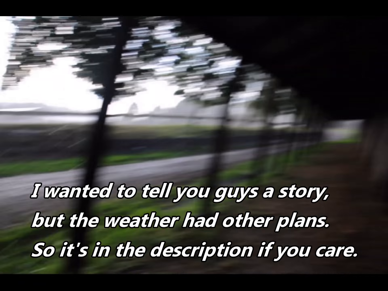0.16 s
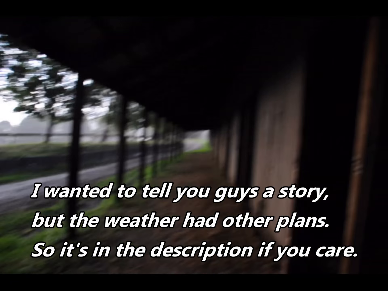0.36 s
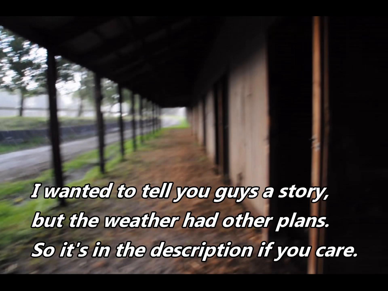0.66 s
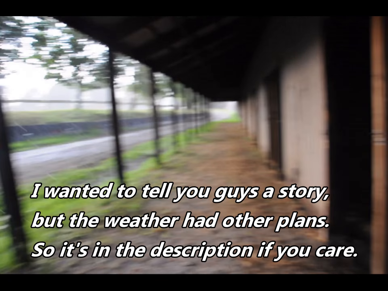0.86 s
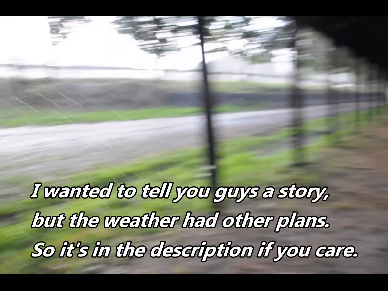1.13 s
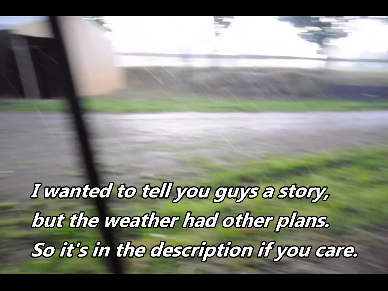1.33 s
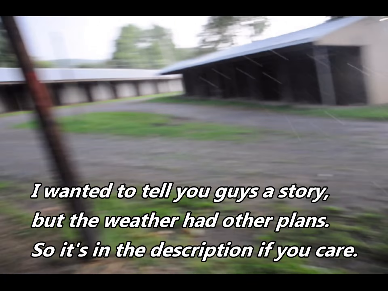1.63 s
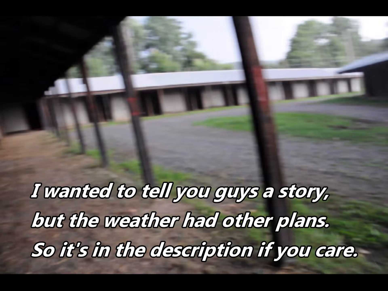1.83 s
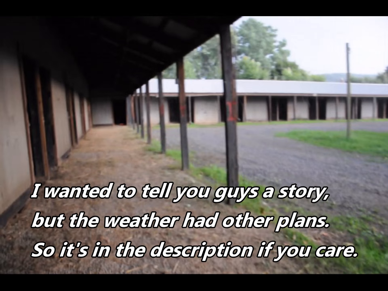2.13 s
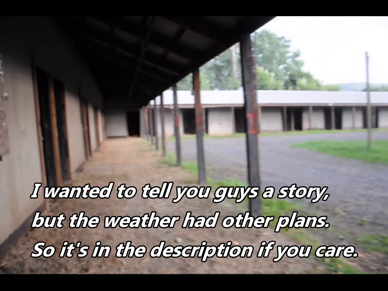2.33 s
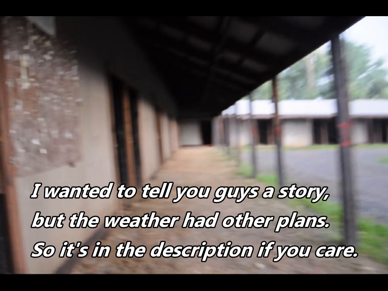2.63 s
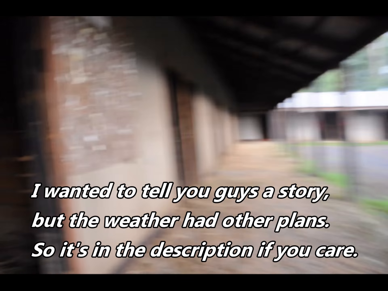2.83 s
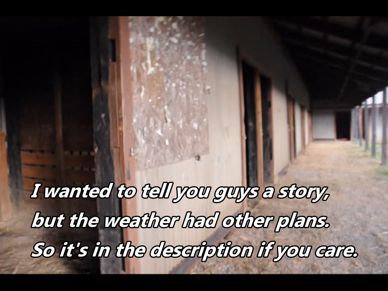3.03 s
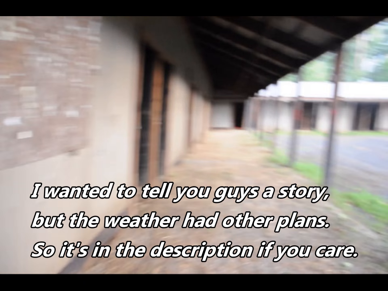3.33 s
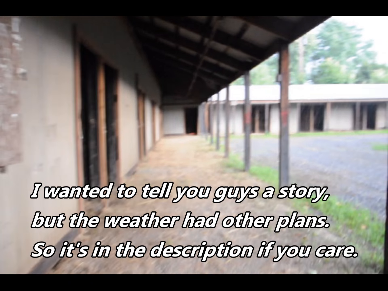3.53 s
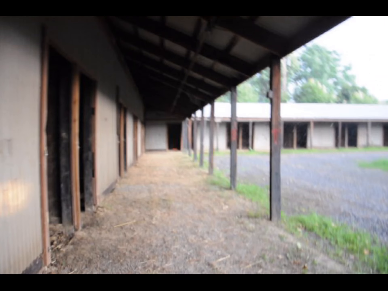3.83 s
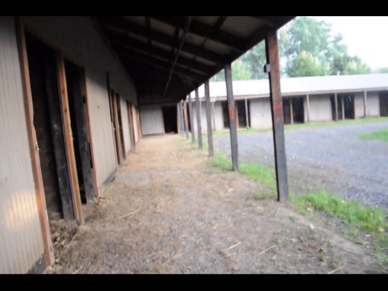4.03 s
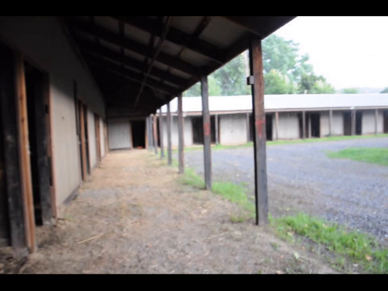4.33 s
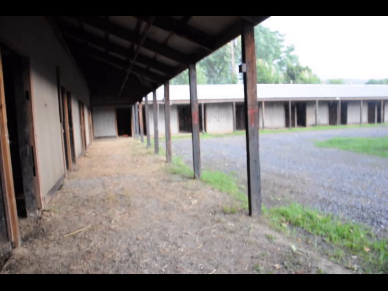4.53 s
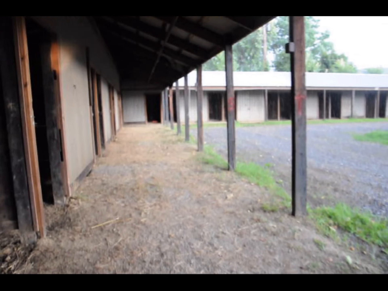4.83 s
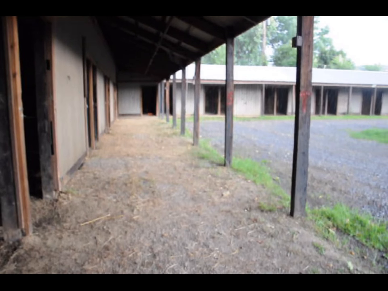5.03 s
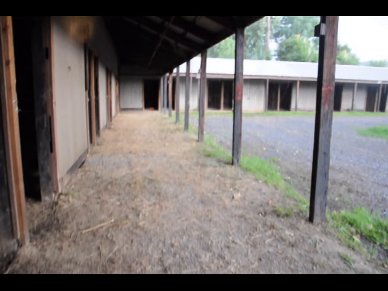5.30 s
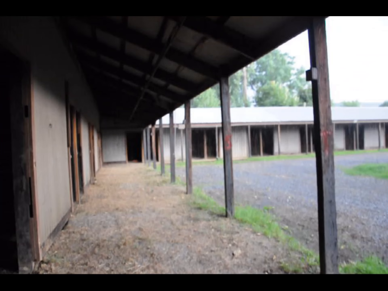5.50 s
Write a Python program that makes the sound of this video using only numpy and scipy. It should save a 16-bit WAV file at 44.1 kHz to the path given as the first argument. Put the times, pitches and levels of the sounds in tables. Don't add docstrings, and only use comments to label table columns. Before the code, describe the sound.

A loud, unbroken downpour drums on tin roofing, low booming and hissing together, with quick splats and knocks, caught by a cheap small camera.

```python
import sys
import numpy as np
from scipy import signal
from scipy.fft import rfft, irfft, next_fast_len
from scipy.io import wavfile
from scipy.ndimage import uniform_filter1d, map_coordinates

SR = 44100
rng = np.random.default_rng(int(sys.argv[2]) if len(sys.argv) > 2 else 0)


def digitize_waveform(pressure):
    field = np.atleast_2d(pressure).T
    bounded = np.clip(field, -1, 1)
    quanta = np.round(bounded * 32767).astype(np.int16)
    wavfile.write(sys.argv[1], SR, quanta)


def volts_from_decibels(level):
    exponent = np.asarray(level, float) / 20
    return 10 ** exponent


N = 249606


def unit(x):
    return x / np.sqrt(np.mean(x ** 2) + 1e-20)


def along(points, hz):
    pitch_hz, value = np.transpose(points)
    return np.interp(np.log(hz + 1), np.log(pitch_hz + 1), value)


def curve(points):
    start_s, value = np.transpose(points)
    return np.interp(np.arange(N) / SR, start_s, value)


def wobble(rate):
    knots = rng.standard_normal(N // 500)
    return map_coordinates(knots, [np.arange(N) * rate / SR])


# start_s, level_db
SQUALLS = [(0, -0.65), (.7, -.7), (.92, 0.7), (1.08, -0.8), (1.78, 2), (2.1, -.5), (2.55, 0), (2.7, 0.5),
           (3.08, -1.4), (3.25, 1), (3.5, -0.6), (3.92, -0.2), (4.1, -0.2), (4.3, 0.9), (4.67, -0.8),
           (4.95, .5), (5.3, -0.5), (5.55, 1)]


def downpour():
    return curve(SQUALLS)


# start_s, facing (1 eaves to -1 wall, no unit)
FACING_PATH = [
    (0, 1),
    (.55, 0.9),
    (1.7, -0.74),
    (2.5, -.7),
    (3.3, -0.25),
    (3.9, 0.3),
    (4.9, 0.83),
    (5.4, -0.45),
    (5.66, 0),
]


def facing_eaves():
    return curve(FACING_PATH)


def run_off_bursts(per_second, life_s):
    t = np.arange(SR // 10) / SR
    starts = (rng.random(N) < per_second / SR) * rng.uniform(0.42, 1, N)
    envelope = np.exp(-t / life_s) * (1 - np.exp(-t / 0.0012))
    swell = signal.fftconvolve(starts, envelope)[:N]
    return unit(swell - swell.mean())


def drops(per_second, spread_db):
    falls = rng.random(N) < per_second / SR
    size_db = spread_db * np.minimum(rng.exponential(size=N), 3)
    return unit(falls * rng.choice([-1, 1], N) * volts_from_decibels(size_db))


# pitch_hz, t60_s
AISLE_DECAY = [(200, 0.57), (1500, 0.33), (5000, 0.36)]


def aisle(x, wet_db):
    hop = SR // 5
    parts = np.pad(x, (0, -N % hop)).reshape(-1, hop)
    hz, t, z = signal.stft(rng.standard_normal((len(parts), 2 * hop)), SR, nperseg=256)
    decay = volts_from_decibels(-60 * t / along(AISLE_DECAY, hz)[:, None])
    tails = signal.istft(z * decay, SR, nperseg=256)[1]
    echoes = signal.fftconvolve(parts, tails / np.linalg.norm(tails[0]), axes=1)
    at = hop * np.arange(len(parts))[:, None] + np.arange(echoes.shape[1])
    return x + volts_from_decibels(wet_db) * np.bincount(at.ravel(), echoes.ravel())[:N]


def patchy(x, patchy_db):
    z = signal.stft(x, nperseg=512)[2]
    field = uniform_filter1d(rng.standard_normal(z.shape), size=8, axis=0)
    field = uniform_filter1d(field, size=8, axis=1)
    return signal.istft(z * volts_from_decibels(patchy_db * unit(field)), nperseg=512)[1][:N]


def coloured(x, spectrum):
    m = next_fast_len(N + 8192)
    hz = np.fft.rfftfreq(m, 1 / SR)
    response = volts_from_decibels(along(spectrum, hz)) * (hz < SR / 8)
    return unit(irfft(rfft(x, m) * response, m)[:N])


def layer(spectrum, per_second, spread_db, far_db, patchy_db, swell_db):
    near = unit(aisle(drops(per_second, spread_db), wet_db=-3.5))
    wash = volts_from_decibels(far_db) * rng.standard_normal(N)
    return unit(volts_from_decibels(swell_db) * coloured(patchy(near + wash, patchy_db), spectrum))


# pitch_hz, level_db (per Hz)
PANEL_SPECTRUM = [(20, -35.5), (55, -28.5), (70, -23), (82, -19.5), (105, -14.5), (200, -2.5), (290, -3.5),
                  (370, 0.5), (500, -1), (600, -3.5), (720, -9.5), (1000, -34)]


def panel_boom(rain_db, facing, gust):
    swell_db = 0.29 * gust + 0.54 * wobble(rate=8)
    boom = layer(PANEL_SPECTRUM, per_second=4000, spread_db=1.0, far_db=4.5, patchy_db=0.8,
                 swell_db=swell_db)
    level_db = -29 + 0.6 * rain_db - 0.54 * facing
    return volts_from_decibels(level_db) * boom


# pitch_hz, level_db (per Hz)
SHEET_SPECTRUM = [(400, -42.5), (560, -14), (660, -4.5), (760, -.5), (880, 0), (1020, -0.4), (1100, -1.5),
                  (1420, -1.74), (1560, -3.5), (2000, -4.5), (2300, -7), (2800, -8.5), (3050, -10.5),
                  (4000, -36.5)]


def sheet_drumming(rain_db, gust):
    swell_db = 0.54 * gust + 0.44 * wobble(rate=20)
    drum = layer(SHEET_SPECTRUM, per_second=3000, spread_db=2.0, far_db=2.0, patchy_db=0.4,
                 swell_db=swell_db)
    return volts_from_decibels(-22.5 + rain_db) * drum


# pitch_hz, level_db (per Hz)
SPRAY_SPECTRUM = [(2000, -40.5), (2750, -11), (2950, -10), (3060, -1), (3600, -1), (4300, -3.5),
                  (4900, -4.5), (5600, -7)]


def gravel_spatter(rain_db, facing, gust):
    swell_db = 1.05 * gust + 0.37 * wobble(rate=22)
    spatter = layer(SPRAY_SPECTRUM, per_second=1800, spread_db=2.5, far_db=1.5, patchy_db=0.4,
                    swell_db=swell_db)
    level_db = -28.5 + 0.79 * rain_db + 0.85 * facing
    return volts_from_decibels(level_db) * spatter


def strikes(events, width_hz, t60, rise_s, below_db):
    out = np.zeros(N + SR)
    t = np.arange(SR // 10) / SR
    hz = np.fft.rfftfreq(len(t), 1 / SR)
    for start_s, level_db, pitch_hz in events:
        band = 1 / (1 + ((hz - pitch_hz) / width_hz) ** 4)
        burst = unit(irfft(rfft(rng.standard_normal(len(t))) * band, len(t)))
        envelope = volts_from_decibels(level_db - below_db - 60 * t / t60) * (1 - np.exp(-t / rise_s))
        out[round(start_s * SR):][:len(t)] += envelope * burst
    return out[:N]


# start_s, level_db (peak), pitch_hz (centre)
EAVES_DROPS = [(0.0288, -9, 3820), (0.179, -15, 3280), (0.2224, -16, 3170), (0.2867, -8.5, 3420),
               (0.3224, -12, 3150), (0.505, -7, 3570), (0.6364, -14, 3280), (0.8944, -10, 3110),
               (0.9494, -19, 3400), (1.109, -14.5, 3380), (1.248, -14, 3030), (1.3369, -10, 3050),
               (1.4411, -16, 3110), (2.2174, -25, 3120), (2.2967, -14, 3070), (2.6894, -9.5, 3000),
               (2.885, -22, 3730), (2.9334, -18, 3550), (3.21, -19, 3610), (3.2984, -23, 3060),
               (3.439, -11, 3430), (3.894, -8, 3430), (3.9789, -11, 4120), (4.0884, -11, 3690),
               (4.3016, -12, 3250), (4.5506, -19, 3470), (5.2784, -18, 3740), (5.3767, -17, 3540),
               (5.4261, -12, 3080), (5.5174, -17, 3760)]


def eaves_splats():
    return strikes(EAVES_DROPS, width_hz=1900, t60=0.048, rise_s=0.0028, below_db=5.0)


# start_s, level_db (peak), pitch_hz (centre)
SHEET_DROPS = [(0.48, -11, 797), (0.951, -11, 1010), (1.099, -11, 767), (1.241, -6, 880), (1.455, -9, 1480),
               (1.608, -15, 934), (1.652, -16, 799), (1.739, -16, 1020), (1.886, -18, 1390),
               (2.052, -11, 961), (2.209, -12, 789), (2.455, -7, 996), (2.694, -6, 1120),
               (2.745, -15, 1340), (2.894, -14, 799), (3.264, -8, 875), (3.471, -10, 1020),
               (3.598, -14, 918), (3.702, -7, 985), (3.915, -12, 1320), (4.123, -13, 859),
               (4.375, -19, 807), (4.465, -16, 1010), (4.795, -6, 970), (4.987, -14, 977),
               (5.037, -11, 1020), (5.09, -6, 880), (5.163, -14, 800), (5.279, -12, 848), (5.502, -10, 907)]


def sheet_knocks():
    return strikes(SHEET_DROPS, width_hz=350, t60=0.066, rise_s=0.0038, below_db=7.5)


def scene():
    rain_db = downpour()
    facing = facing_eaves()
    gust = run_off_bursts(per_second=36, life_s=0.0074)
    roof = panel_boom(rain_db, facing, gust) + sheet_drumming(rain_db, gust)
    ground = gravel_spatter(rain_db, facing, gust)
    mix = roof + ground + eaves_splats() + sheet_knocks()
    return mix[None]


def converter_hiss():
    return volts_from_decibels(-82.5) * unit(uniform_filter1d(rng.standard_normal(N), size=2))


def quarter_rate(dry):
    gaps = np.zeros_like(dry)
    gaps[:, ::4] = 4 * dry[:, ::4]
    sinc = signal.firwin(31, 5500, window=("kaiser", 6.0), fs=SR)
    return signal.fftconvolve(gaps, sinc[None], "same", axes=1)


def roll_off(x):
    return signal.sosfilt(signal.butter(12, 15720, fs=SR, output="sos"), x)


def record(dry):
    opening = np.sin(np.pi / 2 * np.minimum(np.arange(N) / 60, 1)) ** 2
    mix = opening * quarter_rate(dry) + converter_hiss()
    return roll_off(mix)


dry = scene()
out = record(dry)
digitize_waveform(out)
```